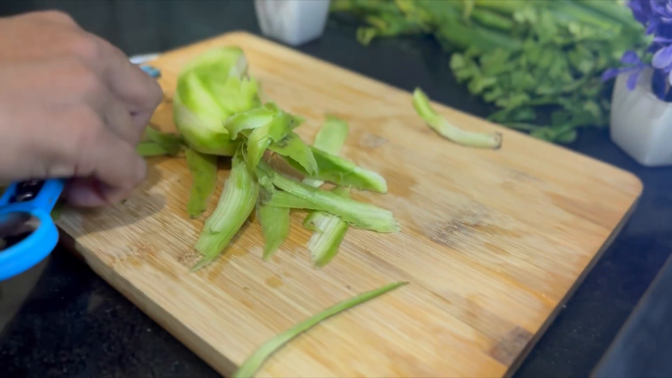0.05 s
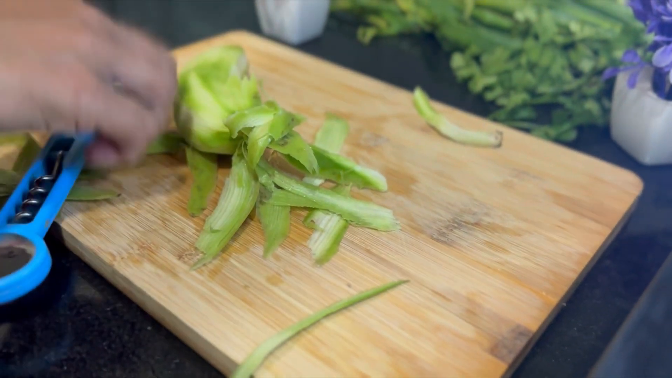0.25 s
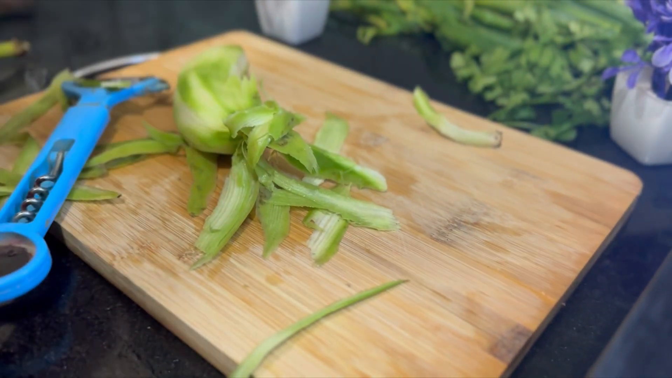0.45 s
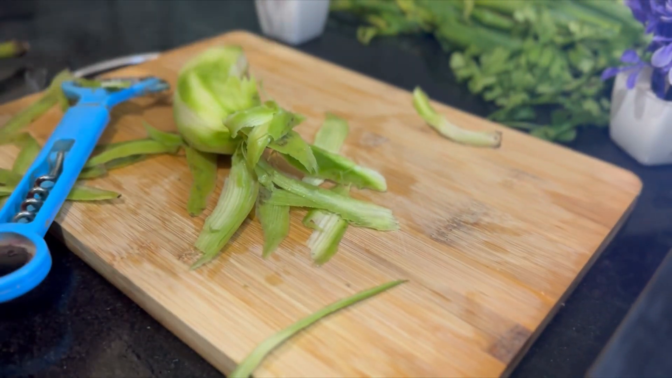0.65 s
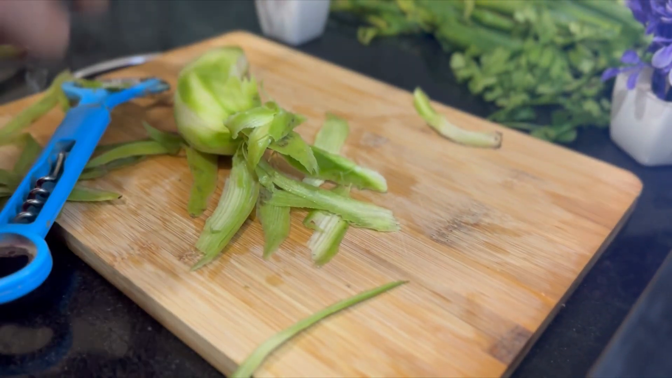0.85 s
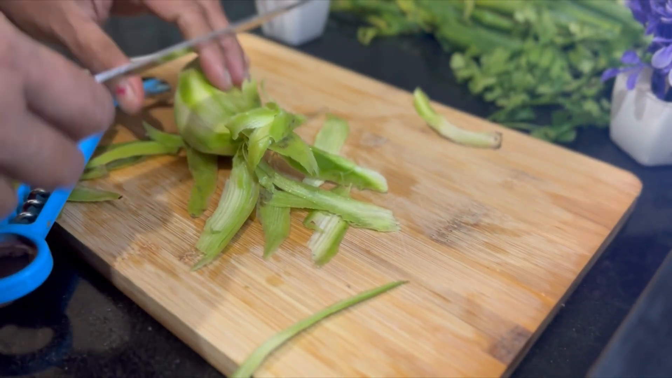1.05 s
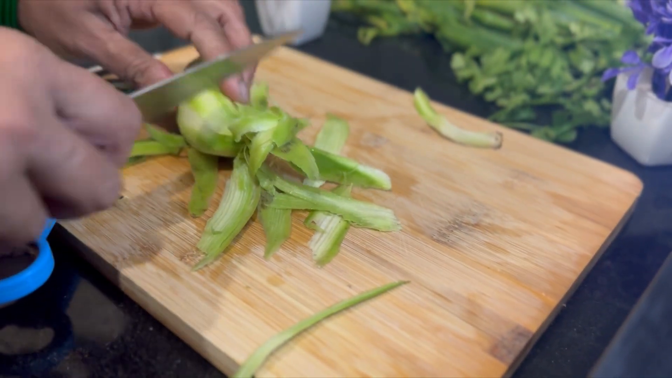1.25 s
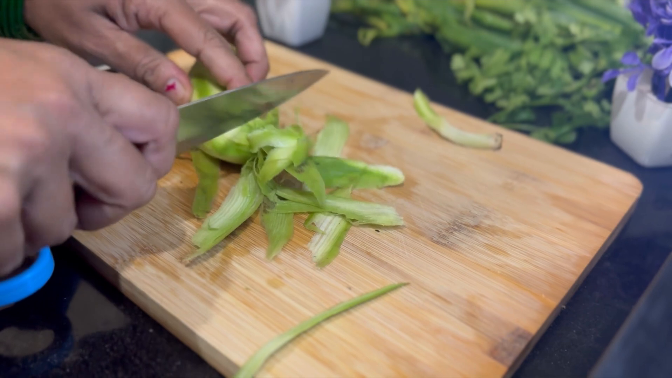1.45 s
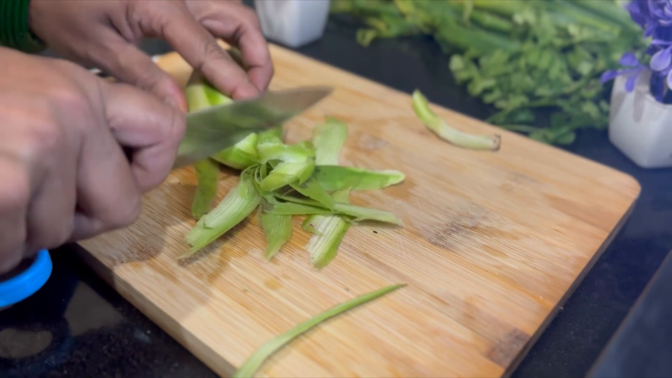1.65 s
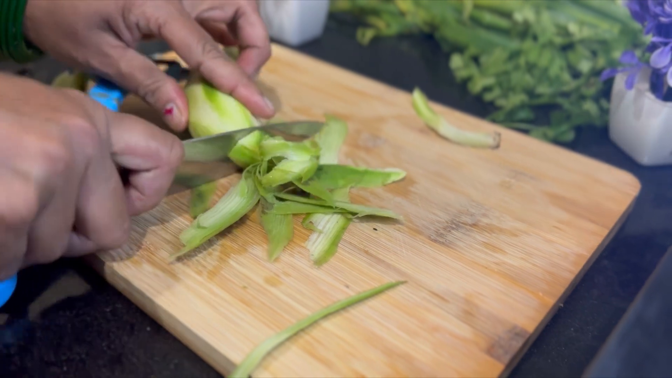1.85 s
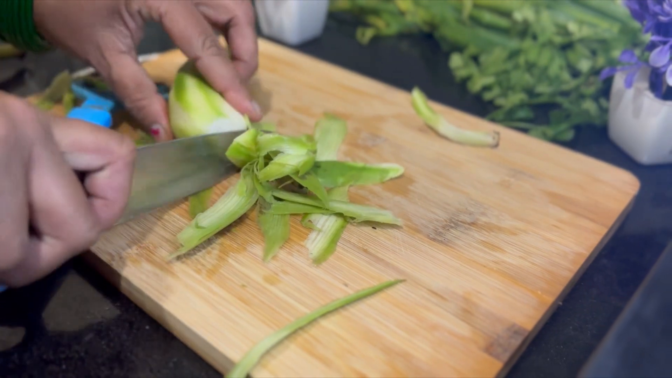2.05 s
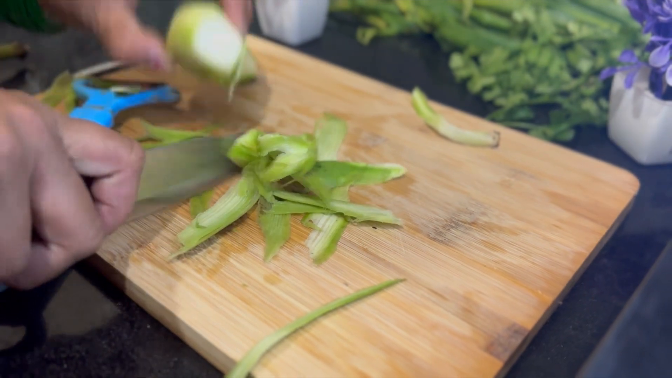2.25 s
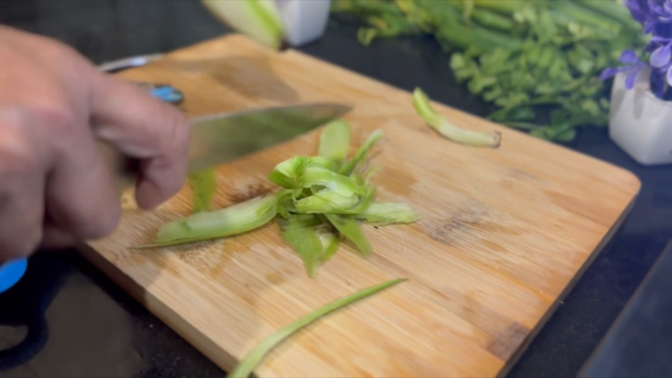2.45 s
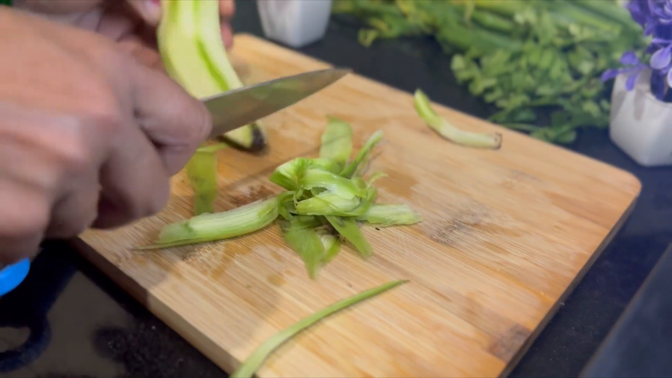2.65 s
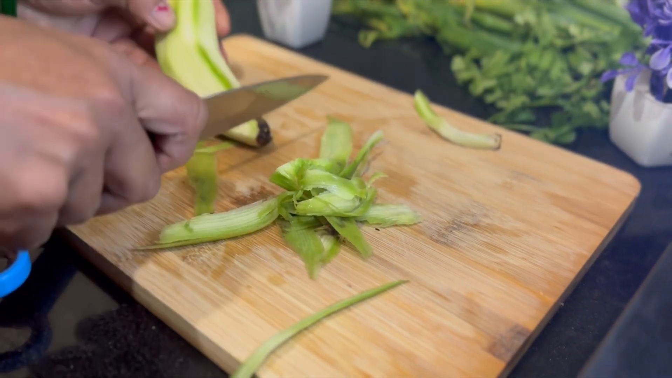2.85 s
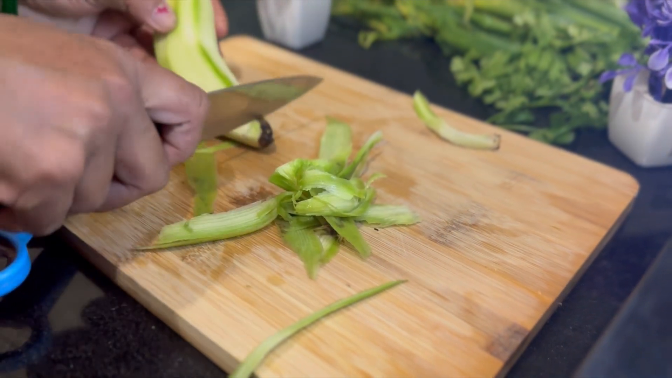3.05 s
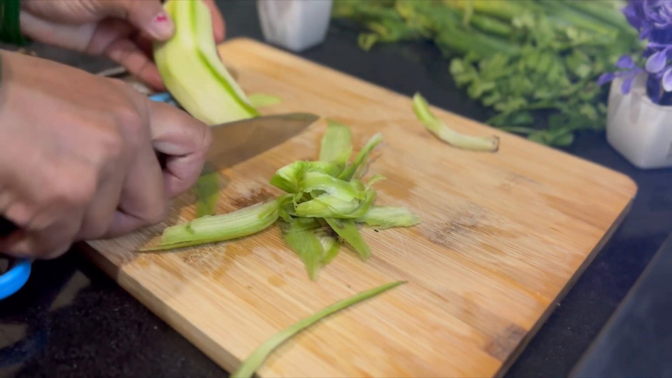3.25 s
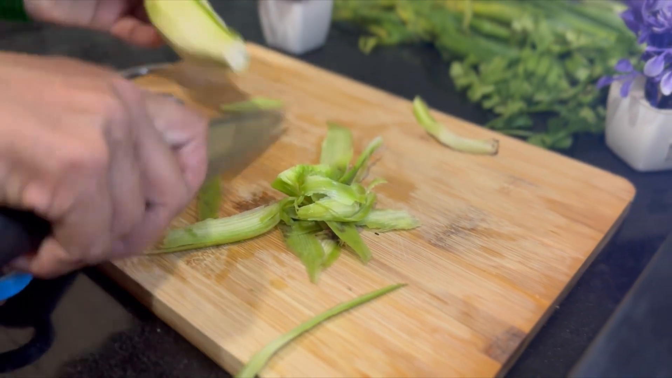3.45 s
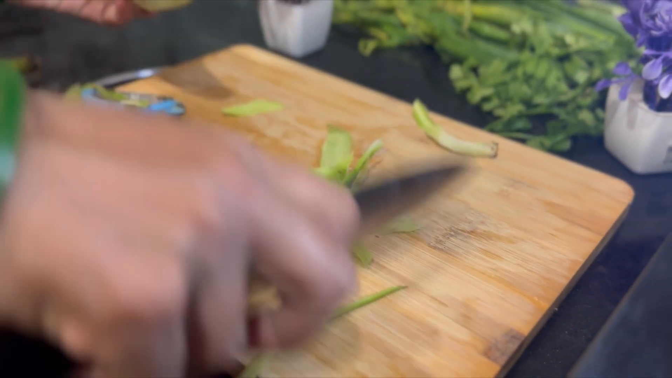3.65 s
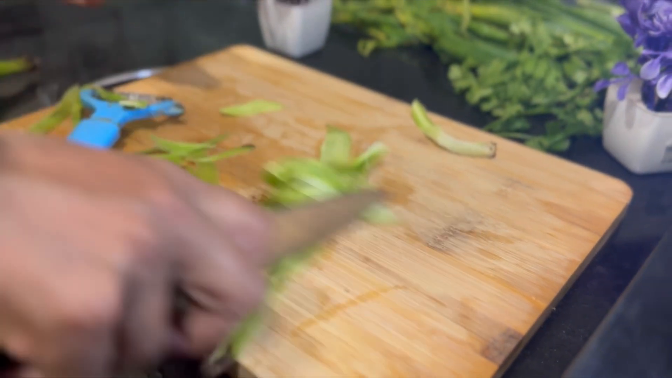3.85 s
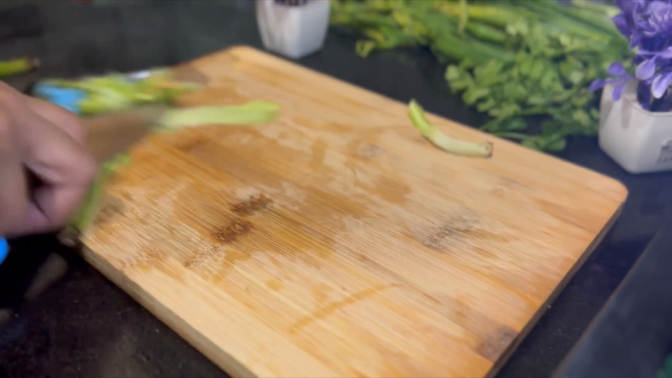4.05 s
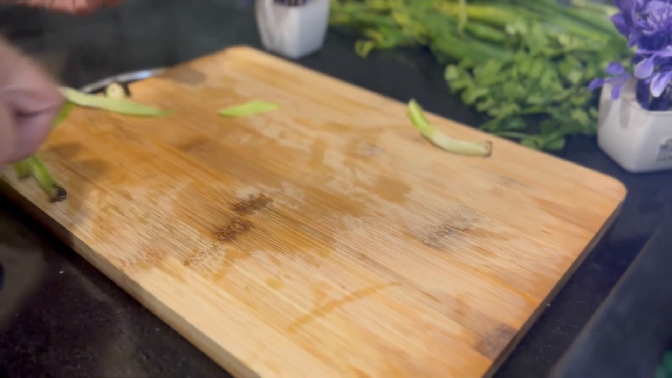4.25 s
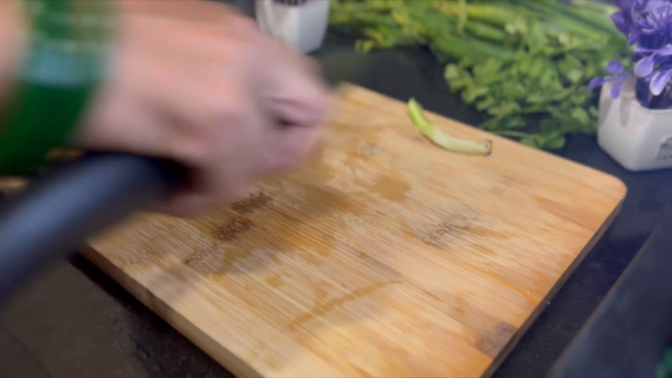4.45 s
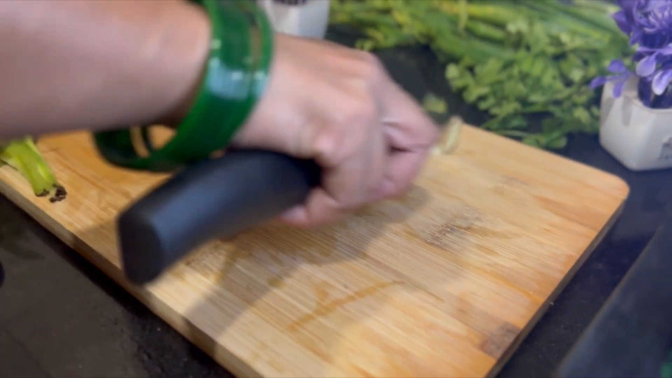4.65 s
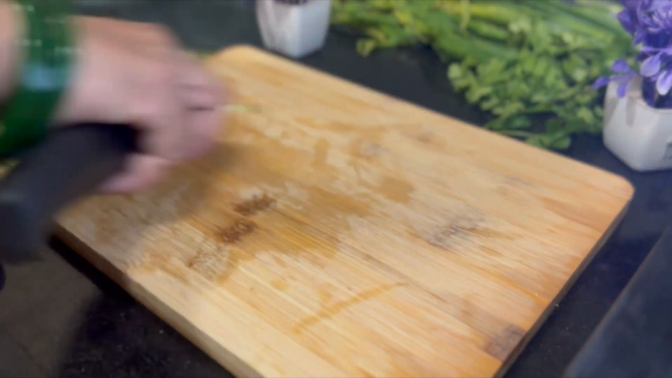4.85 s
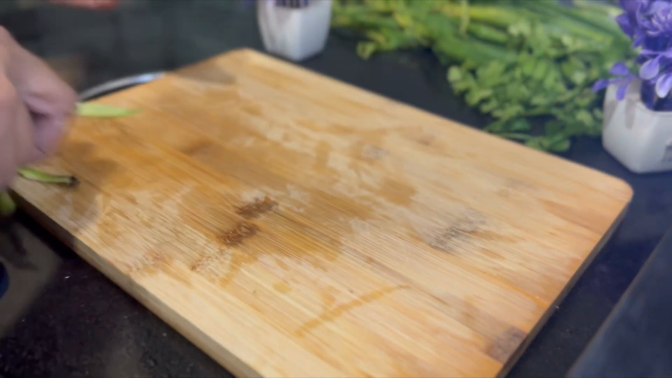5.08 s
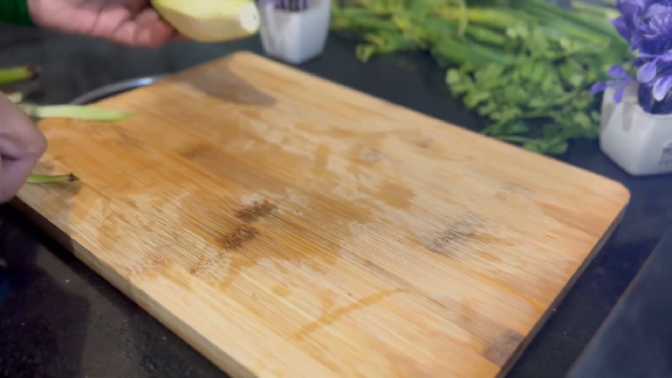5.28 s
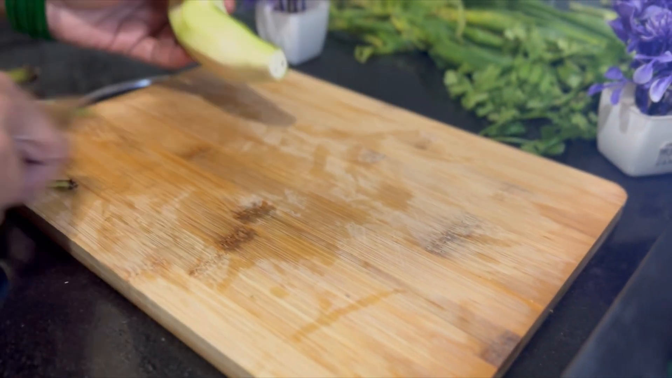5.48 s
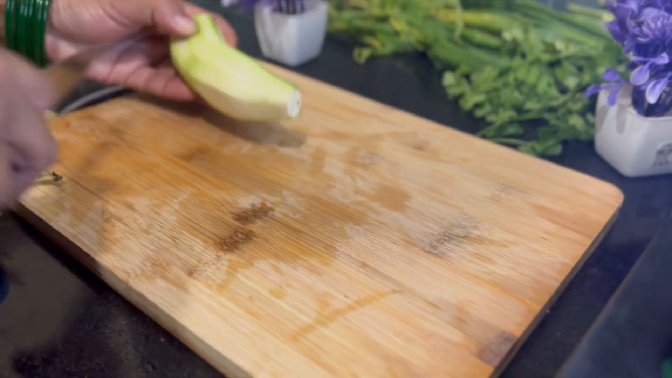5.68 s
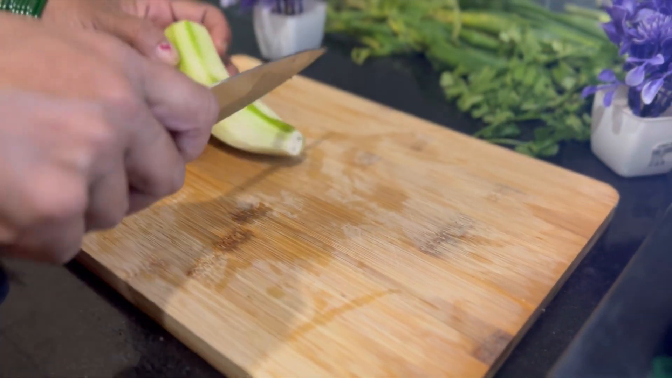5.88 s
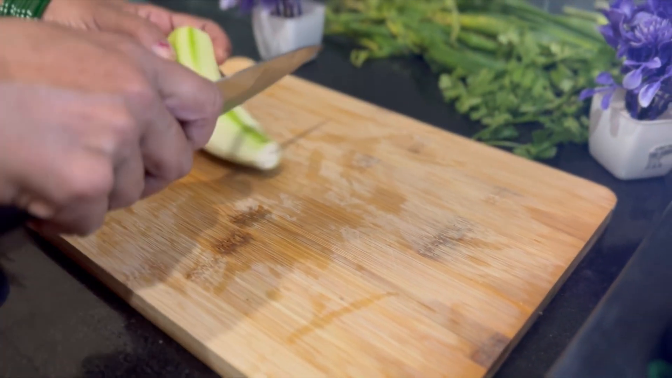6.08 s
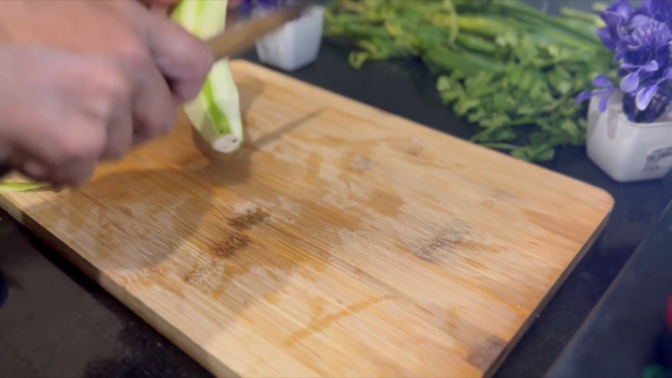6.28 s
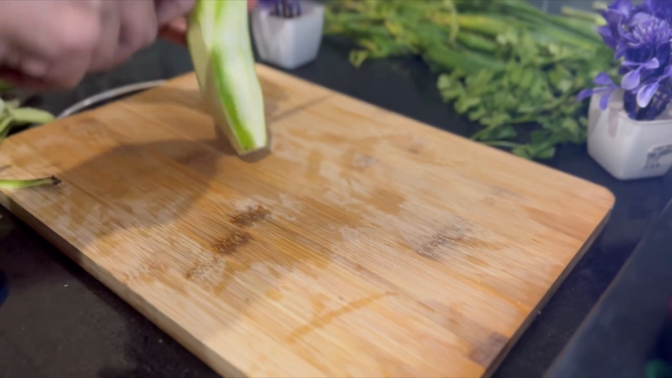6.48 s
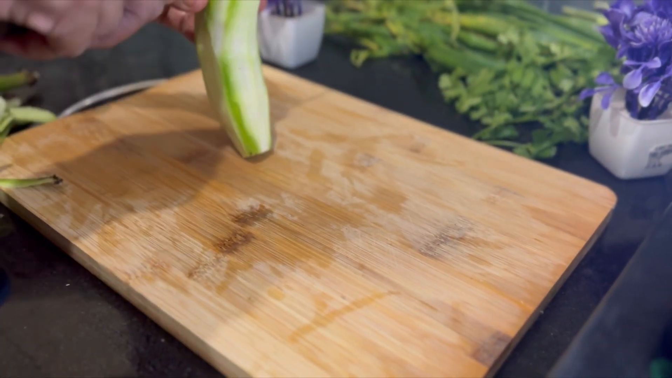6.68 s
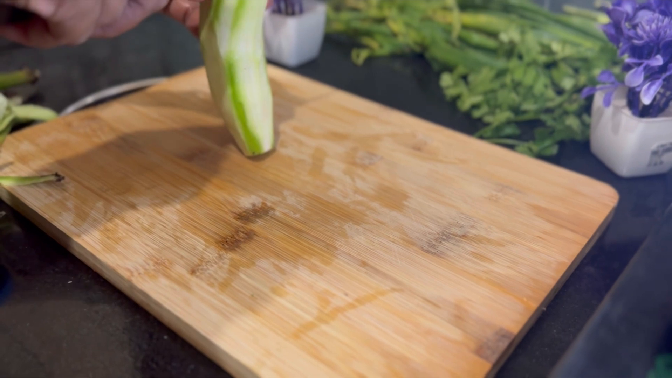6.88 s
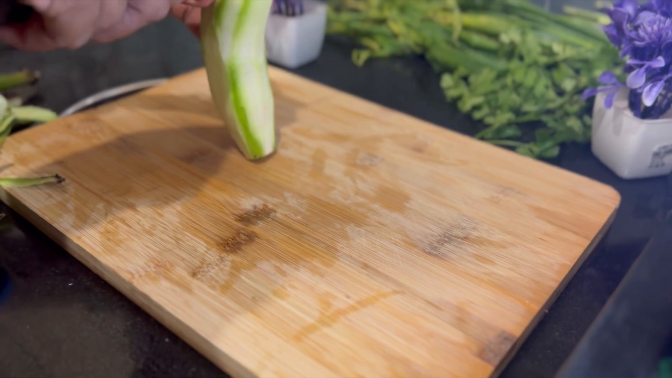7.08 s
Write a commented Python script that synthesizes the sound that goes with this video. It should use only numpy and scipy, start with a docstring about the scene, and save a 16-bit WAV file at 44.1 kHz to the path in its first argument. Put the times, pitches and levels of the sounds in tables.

```python
"""A knife trims a raw banana on a wooden board in a small kitchen, close to a stereo microphone.
Blows are struck resonances: a peeler is put down, two chops crunch through the ends and knock on the board.
Friction is filtered streams of tiny slips: fingers rub wet, ticking peel, the edge scrapes the wood in short
sweeps and peel drags dully in four strokes. Behind, an appliance hums in the room air; walls add echoes."""
import sys
import numpy as np
from scipy import signal
from scipy.fft import rfft
from scipy.io import wavfile
from scipy.ndimage import uniform_filter1d

SR = 44100
rng = np.random.default_rng(int(sys.argv[2]) if len(sys.argv) > 2 else 0)


def transcribe(signal):
    """Save signal, clipped to [-1, 1], as a 16-bit WAV file at the path in sys.argv[1]."""
    frames = np.atleast_2d(signal).T
    limited = np.clip(frames, -1, 1)
    pcm = np.round(limited * 32767).astype(np.int16)
    wavfile.write(sys.argv[1], SR, pcm)


N = 313992
TIME = np.arange(N) / SR
HZ = np.fft.rfftfreq(4096, 1 / SR)

# Levels in all tables are relative: the functions trim and pan them.
# Room air, as a spectrum. Each row: frequency in Hz, level in dB.
AIR = [(20, -28), (35, -10.5), (50, -1.5), (70, 1.5), (120, -5.5), (175, 5), (240, -7), (310, -4.5),
       (450, -15.5), (800, -27.5), (1700, -28), (3500, -36.5), (6700, -35), (16000, -37)]
# Appliance hum. Each row: frequency in Hz, level in dB.
HUM = [(48.6, -68), (196.6, -56.5), (313, -76.5)]
# Fingers rub the damp fruit. Each row: middle in seconds, half length in seconds, level in dB.
HANDLING = [(.09, 0.092, -58.5), (.24, 0.033, -56.5), (.865, 0.031, -88), (.88, 0.083, -57.5),
            (1.16, 0.17, -71.5), (1.37, 0.054, -58), (2.61, .04, -55.5), (3.44, 0.12, -58),
            (6.47, .12, -69.5), (7.11, 0.16, -57.5)]
SNAPS_PER_S, SNAP_DB = 37, -10.5  # stray small snaps under the fingers, level against the crackle
# Wet peel snaps and unsticks. Each row: start in seconds, energy in dB, brightness in dB per octave.
TICKS = [(0.117, -28, 1), (0.3706, -37.5, 5), (0.667, -34, -1), (0.844, -19, 4), (0.9414, -23, 4),
         (0.9875, -20, 4.5), (1.1605, -25, 9.5), (1.314, -19, 1), (1.3655, -14.5, 8), (1.3852, -24, 5.5),
         (2.597, -25.5, .6), (2.675, -21.5, 4.5), (3.023, -31.5, 1), (3.112, -20, 0.5), (3.483, -28, -5.5),
         (4.9299, -15, -1), (5.1769, -12, -3.5), (5.4855, -11, 1), (5.994, -37.5, 7), (6.549, -21.5, 11),
         (6.6697, -30.5, 10)]
# Spectrum of wet peel. Each row: frequency in Hz, level in dB.
TICK_TONE = [(300, -7), (1500, -15), (5000, -9), (9000, -9.5), (12000, -0.5), (15000, -3.5), (16200, -1),
             (17500, -30.5)]
# Soft bumps of fruit, hand and handle.
# Each row: start in seconds, energy in dB, brightness in dB per octave, room share in dB.
THUMPS = [(0.126, -13, -8.5, -3), (0.19, -26.5, 5, 8), (1.665, -20.5, -12, 6), (1.756, -14.5, -20, 7),
          (2.256, -20, 7, 0), (2.654, -18, -1, 3.5), (3.16, -17.5, -5, 4), (3.725, -11.5, 9, 5.5),
          (5.435, -24.5, 2, 15), (5.93, -27.5, -15, -4)]
# Spectrum of the bumps. Each row: frequency in Hz, level in dB.
THUMP_TONE = [(30, -30.5), (80, -14), (117, 4), (150, -4.5), (200, -12.5), (450, -17.5), (900, -38),
              (2500, -41.5), (9000, -69.5)]
# Hard plastic and steel of the peeler clatter.
# Each row: start in seconds, energy in dB, brightness in dB per octave, room share in dB.
CLACKS = [(0.1322, -11, -1.5, -11), (2.6755, -27, -2, -11.5), (4.1228, -4, 4, -12), (4.2364, 3.5, 4, -6),
          (4.2488, -13.5, 5, -18), (4.6455, -12.5, -1.5, -21)]
# Spectrum of the clatter. Each row: frequency in Hz, level in dB.
CLACK_TONE = [(100, 17), (600, -11.5), (1500, -14), (2200, -3), (3000, 0), (4200, 1.5), (6200, 5.5),
              (7500, -8.5), (11000, -14), (16000, -28)]
# Resonances of the peeler's frame and blade. Each row: frequency in Hz, half width in Hz, lift in dB.
PEELER = [(2310, 330, -2), (3220, 870, 3), (4570, 210, 4.5), (6340, 165, -0.5)]
# Blade, peeler or stalk is set on the board.
# Each row: start in seconds, energy in dB, brightness in dB per octave, room share in dB, ring in dB.
KNOCKS = [(0.197, -41, -10.5, 9, -60), (0.272, -32, -11.5, 0, -43), (2.6509, -17, -7.5, -4.5, -45),
          (3.7235, 8, -1.5, -6, -11), (3.792, -4, -5.5, -11.5, -33), (4.039, -17.5, -5.5, -4.5, -34.5),
          (4.085, -24, -8, 4, -42.5), (4.236, -12.5, -1, 2.5, -37), (4.6448, -4, -1.5, -5.5, -43.5),
          (4.987, -20.5, -6.5, -4, -40), (5.141, 9.5, 1.87, -6.5, -7), (5.424, 5, 0, -5.5, -5)]
# Spectrum of the knocks. Each row: frequency in Hz, level in dB.
KNOCK_TONE = [(40, -32), (130, -14.5), (280, -18), (420, -13.5), (850, -5.5), (1250, -9), (1800, -9.5),
              (2400, -11), (3000, -11.5), (4200, -23.5), (7000, -32.5), (16000, -43)]
# Board resonances under chops and knocks. Each row: frequency in Hz, half width in Hz, lift in dB.
BOARD = [(596, 30, 6), (702, 29, 1), (1031, 82, 6.5), (1285, 15, 6.5), (1557, 210, 13.5), (2104, 420, 7.5),
         (2290, 40, 2)]
# The blade breaks through the fruit and hits the board.
# Each row: start in seconds, energy in dB, brightness in dB per octave, room share in dB, ring in dB.
CHOPS = [(1.756, 15.5, -1, -2, 4), (3.155, 12.5, -0.05, 3.5, 0.5)]
# Spectrum of the chops. Each row: frequency in Hz, level in dB.
CHOP_TONE = [(40, -35.5), (130, -26.5), (260, -27), (420, -21), (570, -11), (830, -17), (1150, -7.5),
             (1800, -6.5), (2400, -7), (3000, -13), (4200, -22.5), (8000, -29.5), (16000, -25)]
# Board and blade ringing together.
# Each row: frequency in Hz, level in dB, time to fall 60 dB in seconds at a damping of one.
RING = [(592, -11, 0.21), (700, -18, 0.48), (781, -34, 0.82), (910, -28, 0.4), (1012, -26, 0.53),
        (1082, -19, 0.41), (1227, -21, 0.51), (1497, -14, 0.42), (1620, -18, 0.5), (1739, -7, 0.25),
        (1809, -20, 0.43), (1863, -20, 0.41), (1960, -16, 0.47), (2051, -15, 0.4), (2250, -15, 0.3),
        (2335, -4, 0.15), (2575, -15, .28), (2670, -14, .24), (3110, -20, .24)]
# Blade and hands slide softly along the fruit.
# Each row: middle in seconds, half length in seconds, level in dB.
SLIDES = [(1.37, 0.32, -70), (2.275, .035, -52.5), (2.34, 0.072, -64.5), (5.86, 0.033, -66.5),
          (6.1, 0.17, -73.5), (6.33, 0.083, -73)]
# Spectrum of the sliding. Each row: frequency in Hz, level in dB.
SLIDE_TONE = [(300, -0.5), (950, -2), (1600, 0), (2400, -10.5), (3500, -18.5), (9000, -15), (16000, -21.5)]
# The blade is pressed through the fruit.
# Each row: start in seconds, breakthrough in seconds, final level in dB.
CUTS = [(1.55, 1.767, -35.5), (3.111, 3.154, -27)]
CUT_BUILD_DB, CUT_RELEASE_S = 24.5, .003  # the crunch swells with the force and stops at breakthrough
# Spectrum of the crunch. Each row: frequency in Hz, level in dB.
CUT_TONE = [(200, -14), (900, -3.5), (1600, -5), (3000, 0.5), (4200, -2.5), (6500, 1.5), (9000, -4.5),
            (12000, 4.5), (16000, -1.5)]
# Resonances of the blade held in the fruit. Each row: frequency in Hz, half width in Hz, lift in dB.
FLAT = [(950, 120, 5.5), (1640, 180, 4), (3240, 250, 5), (5250, 400, 7.5)]
# A bundle of fibres tears at once. Each row: start in seconds, level in dB, decay in seconds.
TEARS = [(1.641, -33, 0.0037), (1.686, -42, 0.0095), (1.717, -28.5, 0.011), (1.744, -24.5, 0.004),
         (2.052, -57, 0.0077), (2.242, -35, 0.014)]
TEAR_RISE_S = .007
# The blade is levered sideways in the cut.
# Each row: middle in seconds, half length in seconds, level in dB.
PRIES = [(1.96, 0.041, -50)]
# The edge sweeps over the wood.
# Each row: start in seconds, length in seconds, hiss in dB, chatter of blade and board in dB.
SWEEPS = [(3.772, 0.034, -35.5, -47), (3.855, 0.27, -43.5, -49.5), (4.083, 0.099, -43.5, -47.5),
          (4.633, 0.23, -42, -42.5), (4.912, 0.027, -38, -47.5), (5.184, 0.05, -33.5, -41.5),
          (5.441, 0.034, -38, -46.5)]
# The edge bites, eases as it travels, then lifts.
SWEEP_ATTACK_S, SWEEP_RELEASE_S, SWEEP_SAG_DB_PER_S = 0.013, 0.0061, 32
# Spectrum of the hiss. Each row: frequency in Hz, level in dB.
SWEEP_TONE = [(300, -15), (2000, -32), (4500, -16), (6500, 8), (8000, 11), (12000, 17), (16000, 11)]
# Chatter resonances of blade and board.
# Each row: frequency in Hz, full width in Hz before widening, level in dB.
CHATTER = [(980, 104, -9), (1306, 20, -4), (1590, 26, -44), (2123, 34, -1.5), (3300, 165, -6),
           (4890, 264, -4)]
# The edge sticks and sings.
# Each row: middle in seconds, frequency in Hz, level in dB, half length in seconds.
SQUEAKS = [(4.942, 1260, -42, .007), (4.942, 3380, -49, .006), (4.975, 1230, -54, .012),
           (6.17, 4840, -76, .12)]
# Dull drag of peel over the board. Each row: middle in seconds, half length in seconds, level in dB.
DRAGS = [(4.22, .17, -54.5), (4.8, 0.14, -57), (5.3, 0.23, -54), (5.85, .25, -65.5)]
# Spectrum of the drag. Each row: frequency in Hz, level in dB.
DRAG_TONE = [(40, -10), (75, -20), (100, 12), (135, 0), (200, -14), (310, -8.5), (500, -17), (1100, -18.5),
             (2500, -17), (6000, -48)]
# Decay of the kitchen's late tail. Each row: frequency in Hz, time to fall 60 dB in seconds.
ROOM_T60 = [(100, 0.36), (500, .7), (2000, 0.51), (6000, 0.43), (15000, 0.55)]
# Colour of the kitchen. Each row: frequency in Hz, level in dB.
ROOM_TONE = [(60, 4), (130, 7), (260, 11), (400, 8.5), (600, 0), (1400, -7), (2200, 0), (4000, 1),
             (16000, -5.5)]
# Echoes of nearby walls. Each row: delay in seconds, left level in dB, right level in dB.
ECHOES = [(.0088, -1, -18.5), (0.013, -13.5, -24.5), (0.018, -18.5, -13.5), (0.025, -9, -6.5),
          (0.0313, -29, -18)]
# Treble colour of the sum of both sides. Each row: frequency in Hz, level in dB.
SUM_TREBLE = [(9300, -0.5), (10150, -15.5), (11000, 3.5), (12400, 2), (13300, -21.5), (14100, 2.5),
              (15700, 2), (16300, -25)]
# Treble colour of the left-right difference. Each row: frequency in Hz, level in dB.
DIFFERENCE_TREBLE = [(8000, 0), (9300, 0), (10150, 5), (11000, -3), (12000, -6), (12700, 2), (13300, 8),
                     (14100, 1), (15700, -2), (16300, -26)]
EDGE_HZ = 16500  # upper band limit


def amp(db):
    """Decibels to gain."""
    return 10 ** (np.asarray(db) / 20)


def evened(x):
    """Scales to an rms of one."""
    return x / np.sqrt(np.mean(x ** 2) + 1e-20)


def read(points, hz):
    """Reads a table on a log-frequency axis."""
    f, value = np.transpose(points)
    return np.interp(np.log(hz + 1), np.log(np.sort(f) + 1), value)


def add(mix, s, sound):
    """Mixes a sound in at a time in seconds."""
    part = mix[..., max(round(s * SR), 0):][..., :sound.shape[-1]]
    part += sound[..., :part.shape[-1]]


def causal(db):
    """Impulse response with a sharp front (minimum phase) and the given dB on HZ."""
    log_gain = np.log(amp(np.r_[db, db[-2:0:-1]]))
    return np.fft.ifft(np.exp(np.conj(signal.hilbert(log_gain)))).real


def pulse(tone, tilt=0, resonances=()):
    """One blow of unit energy; harder contact tilts it brighter, resonances make it ring."""
    db = read(tone, HZ) + tilt * np.log2(np.clip(HZ, 200, 14000) / 1000)
    for hz, width, lift in resonances:
        db = db + lift / (1 + ((HZ - hz) / width) ** 2)
    h = causal(db)
    return h / np.linalg.norm(h)


def coloured(x, tone, tilt=0, resonances=()):
    """Gives a signal a spectrum and an rms of one."""
    return evened(signal.oaconvolve(x, pulse(tone, tilt, resonances))[:N])


def wander(per_s):
    """Smooth chance of unit size."""
    return evened(np.interp(TIME * per_s, np.arange(4000), rng.standard_normal(4000)))


def grains(per_s, spread_db, clump_db):
    """Tiny uneven slips and ruptures come in clumps, but the hand's effort sets their mean power."""
    size = amp(spread_db * np.minimum(rng.exponential(1, N), 4)) * rng.standard_normal(N)
    slips = size * (rng.random(N) < per_s / SR) * amp(clump_db * wander(160))
    mean_power = abs(uniform_filter1d(slips ** 2, size=1600))
    return slips / np.sqrt(mean_power + 1e-6)


def swells(rows):
    """Gentle hand movements: each gathers speed and slows again in a bell shape."""
    return sum(amp(db) * np.exp(-((TIME - s) / half_s) ** 2) for s, half_s, db in rows)


def stroke(start, length, attack_s, release_s, slope_db_per_s=0):
    """Pressure of one stroke: attack, a hold that grows or sags, release."""
    t = TIME - start
    attack = np.clip(t / attack_s, 0, 1)
    hold = amp(slope_db_per_s * np.clip(t, 0, length))
    return attack * hold * np.exp(-np.maximum(t - length, 0) / release_s)


def contact(rough, length_s):
    """A push followed by a brief rattle: it spreads the blow in time and leaves its colour alone."""
    t = np.arange(900) / SR
    rattle = rng.standard_normal(len(t)) * np.exp(-t / length_s) * (1 - np.exp(-2 * t / length_s))
    force = (t == 0) + rough * rattle / np.linalg.norm(rattle)
    power = uniform_filter1d(abs(rfft(force, 4096)) ** 2, size=9)
    whitening = causal(-10 * np.log10(power))
    return signal.fftconvolve(force, whitening)[:4096]


def blows(rows, tone, rough, length_s, resonances=()):
    """Blows on one object: row 0 is the direct sound, row 1 the part that fills the room."""
    out = np.zeros((2, N))
    for s, db, tilt, room_db, *_ in rows:
        hit = signal.fftconvolve(pulse(tone, tilt, resonances), contact(rough, length_s))
        add(out, s, amp([[db], [db + room_db]]) * hit / np.linalg.norm(hit))
    return out


def background(air_db=-59.0, side_db=-13, hiss_side_db=-84):
    """Nearly mono room air with faint hiss to the sides, and the wavering hum of an appliance."""
    air = amp(air_db) * coloured(rng.standard_normal(N), AIR) * amp(0.4 * wander(8.4))
    side = amp(air_db + side_db) * coloured(rng.standard_normal(N), AIR)
    hiss_tone = [(300, 1.5), (1700, 10.0), (4000, -0.5), (16000, -40.5)]  # (Hz, dB)
    side += amp(hiss_side_db) * coloured(rng.standard_normal(N), hiss_tone)
    hum = np.zeros(N)
    for hz, db in HUM:
        tone = np.sin(2 * np.pi * hz * TIME + 0.33 * wander(6))
        hum += amp(db) * evened(tone) * amp(.8 * wander(11))
    return np.array([air + side, air - side]) + hum


def handling(rub_db=-3):
    """Fingers on damp fruit slip in a fine crackle with stray snaps."""
    snaps = evened(rng.standard_normal(N) * (rng.random(N) < SNAPS_PER_S / SR))
    crackle = grains(per_s=1500, spread_db=1.5, clump_db=2.5)
    rub = coloured(crackle + amp(SNAP_DB) * snaps, TICK_TONE)
    return amp(rub_db) * rub * swells(HANDLING)


def ticks(room_db=-10):
    """Short bright snaps of wet peel."""
    return blows([(*row, room_db) for row in TICKS], TICK_TONE, rough=1.2, length_s=.0015)


def thumps():
    """Soft bumps of fruit, hand and handle: dull pulses with little rattle."""
    return blows(THUMPS, THUMP_TONE, rough=0.48, length_s=0.0082) * amp([[0], [-5]])


def clacks():
    """Peeler clatter: hard contacts excite the resonances of its frame and blade."""
    return blows(CLACKS, CLACK_TONE, rough=5.1, length_s=.0013, resonances=PEELER)


def knocks():
    """Things set on the board: rattling contacts excite the resonances of the wood."""
    return blows(KNOCKS, KNOCK_TONE, rough=6.0, length_s=0.0027, resonances=BOARD)


def ringing(ring_db=-3, damping=0.77):
    """Board and blade ring on after chops and knocks; each side hears its own phases of the modes."""
    out, t = np.zeros((2, N)), np.arange(SR * 3 // 4) / SR
    modes = np.array([amp(db - 60 * damping * t / t60) * np.exp(2j * np.pi * hz * t) for hz, db, t60 in RING])
    for s, _, _, _, db in CHOPS + KNOCKS:
        phases = np.exp(2j * np.pi * rng.random((2, len(RING))))
        ring = (phases @ modes).real * (1 - np.exp(-t / 0.0067))
        add(out, s, amp(db + ring_db) * ring / np.linalg.norm(ring[0]))
    return out


def sliding():
    """Blade and hands slide along the fruit: soft noise that swells with each movement."""
    return coloured(rng.standard_normal(N), SLIDE_TONE) * swells(SLIDES)


def cutting(cut_db=-2):
    """Fibres burst ahead of the edge and shake the blade, louder as the force grows."""
    force = swells(PRIES)
    for start, end, db in CUTS:
        length = end - start
        growth = stroke(start, length, TEAR_RISE_S, CUT_RELEASE_S, CUT_BUILD_DB / length)
        force += amp(db - CUT_BUILD_DB) * growth
    for s, db, decay_s in TEARS:
        force += amp(db) * stroke(s, TEAR_RISE_S, TEAR_RISE_S, decay_s)
    bursts = grains(per_s=4400, spread_db=2.5, clump_db=4.5)
    return amp(cut_db) * coloured(bursts, CUT_TONE, tilt=0.44, resonances=FLAT) * force


def chops():
    """The blade breaks through and strikes the board, exciting the resonances of the wood."""
    return blows(CHOPS, CHOP_TONE, rough=2.0, length_s=0.0012, resonances=BOARD)


def blade(x, widening):
    """Slips shake the resonances of blade and board."""
    body = np.zeros(len(HZ))
    for hz, width, db in CHATTER:
        body += amp(db) ** 2 / (1 + (2 * (HZ - hz) / (width * widening)) ** 2)
    return evened(signal.oaconvolve(x, causal(10 * np.log10(body)))[:N])


def sweeping(hiss_db=-1, chatter_db=-1):
    """The edge catches on the grain: the slips hiss and shake the resonances of blade and board."""
    slips = grains(per_s=3100, spread_db=-1.0, clump_db=3)
    chatter = amp(chatter_db) * blade(slips, widening=2.9)
    hiss = amp(hiss_db) * coloured(slips, SWEEP_TONE)
    out = np.zeros(N)
    for s, length, bright_db, body_db in SWEEPS:
        pressure = stroke(s, length, SWEEP_ATTACK_S, SWEEP_RELEASE_S, -SWEEP_SAG_DB_PER_S)
        out += pressure * (amp(bright_db) * hiss + amp(body_db) * chatter)
    return out


def dragging(drag_db=-4):
    """Peel drags over the board in sparse, clumped slips with a dull tone."""
    slips = grains(per_s=440, spread_db=0.0, clump_db=4)
    return amp(drag_db) * swells(DRAGS) * coloured(slips, DRAG_TONE)


def squeaks():
    """The edge sticks and sings: brief sines of slightly unsteady pitch."""
    out = np.zeros(N)
    for s, hz, db, half_s in SQUEAKS:
        turns = np.cumsum(hz * (1 + 0.0027 * wander(220))) / SR
        out += swells([(s, half_s, db)]) * np.sin(2 * np.pi * turns)
    return out


def room(x, early_db=-3, early_t60=0.24, late_db=-6.0):
    """The kitchen: a few wall echoes, a dense early cluster and a longer tail."""
    taps = rng.standard_normal((2, SR)) * (rng.random((2, SR)) < .2)
    hz, t, z = signal.stft(taps, SR, nperseg=256)
    alike = .6 / (1 + (hz[:, None] / 700) ** 2) + .39  # the sides agree more in the bass
    z[1] = alike * z[0] + np.sqrt(1 - alike ** 2) * z[1]
    response = np.zeros((2, SR))
    for db, t60 in [(early_db, early_t60), (late_db, read(ROOM_T60, hz)[:, None])]:
        tail = signal.istft(z * 1e-3 ** (t / t60), SR, nperseg=256)[1][:, :SR]
        tail *= np.clip((TIME[:SR] - .002) / 0.0097, 0, 1)  # fades in after 2 ms
        response += amp(db) * tail / np.linalg.norm(tail[0])
    for s, left_db, right_db in ECHOES:
        add(response[0], s, amp([left_db]))
        add(response[1], s + 0.00024, amp([right_db]))
    x = signal.oaconvolve(x, causal(read(ROOM_TONE, HZ)))[:N]
    return signal.oaconvolve(x[None], response, axes=1)[:, :N]


def placed(x, lag_s, pan_db):
    """A source left of centre reaches the right side later and weaker."""
    right = np.zeros(N)
    add(right, lag_s, x)
    return np.array([x * amp(pan_db / 2), right * amp(-pan_db / 2)])


def scene():
    """Blows and friction on the board, heard directly and through the kitchen."""
    friction = handling() + sliding() + cutting() + sweeping() + dragging() + squeaks()
    wood = thumps() + knocks() + chops()
    small = ticks() + clacks() + friction * amp([[-1], [-5]])  # direct dB, room dB
    direct = placed(wood[0], lag_s=.00029, pan_db=4.0) + placed(small[0], lag_s=.00012, pan_db=0.5)
    return direct + ringing() + room(wood[1] + small[1]) + background()


def record(dry):
    """Sum and difference get their own treble colour; deepest bass drops; peaks round off; band limit."""
    mid = signal.oaconvolve((dry[0] + dry[1]) / 2, causal(read(SUM_TREBLE, HZ)))[:N]
    side = signal.oaconvolve((dry[0] - dry[1]) / 2, causal(read(DIFFERENCE_TREBLE, HZ)))[:N]
    bass_cut = signal.butter(4, 42, "highpass", fs=SR, output="sos")
    heard = signal.sosfilt(bass_cut, np.array([mid + side, mid - side]))
    heard = heard / (1 + (heard / .93) ** 8) ** (1 / 8)
    band_limit = signal.firwin(511, EDGE_HZ, window=("kaiser", 9), fs=SR)
    return signal.oaconvolve(heard, band_limit[None], "same")


dry = scene()
out = record(dry)
transcribe(out)
```